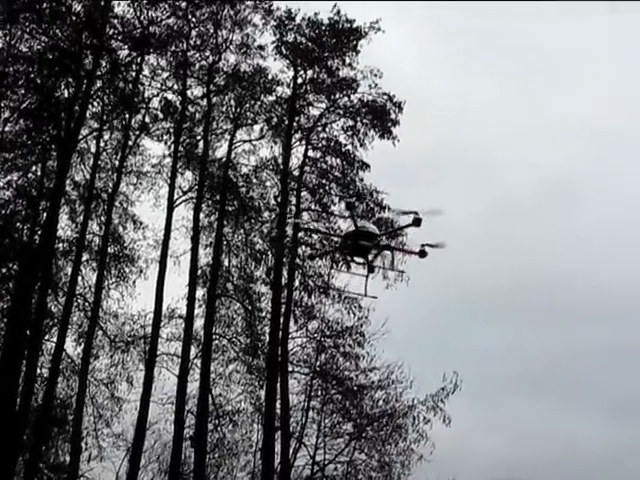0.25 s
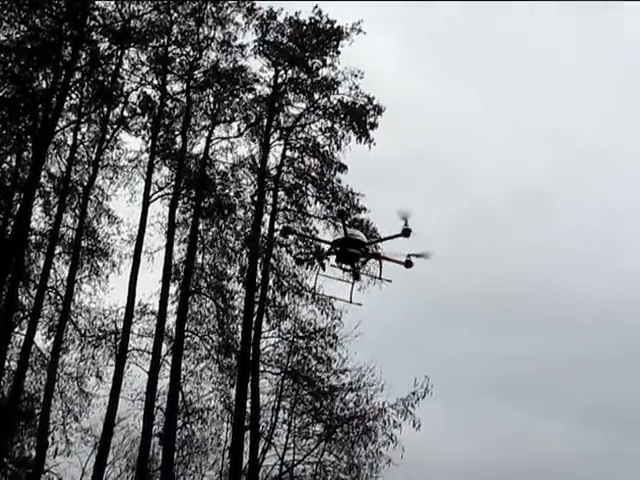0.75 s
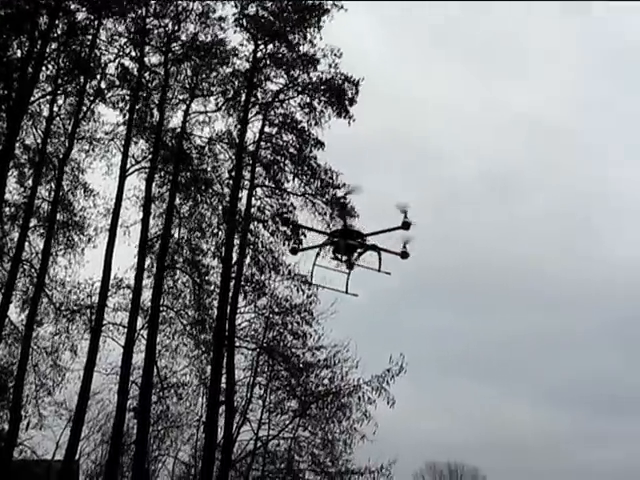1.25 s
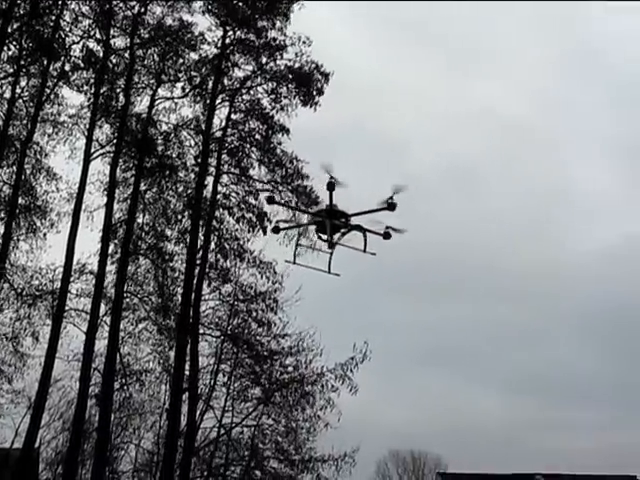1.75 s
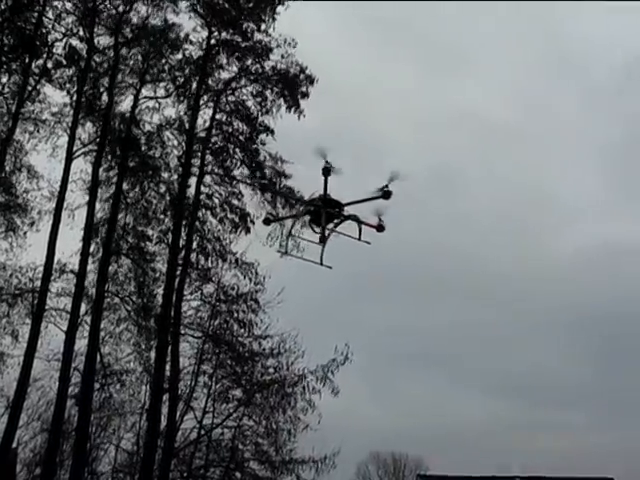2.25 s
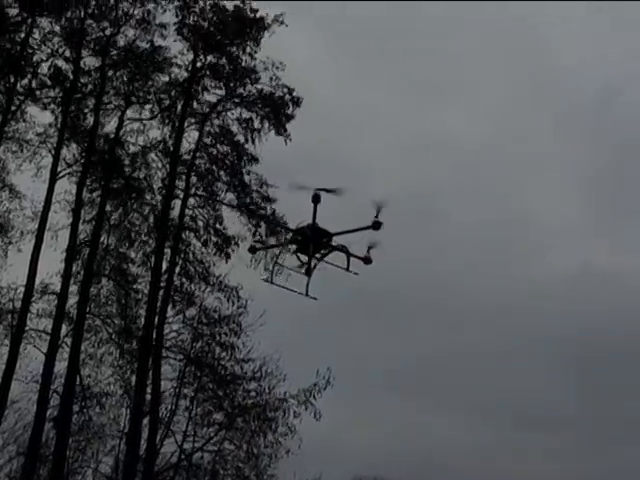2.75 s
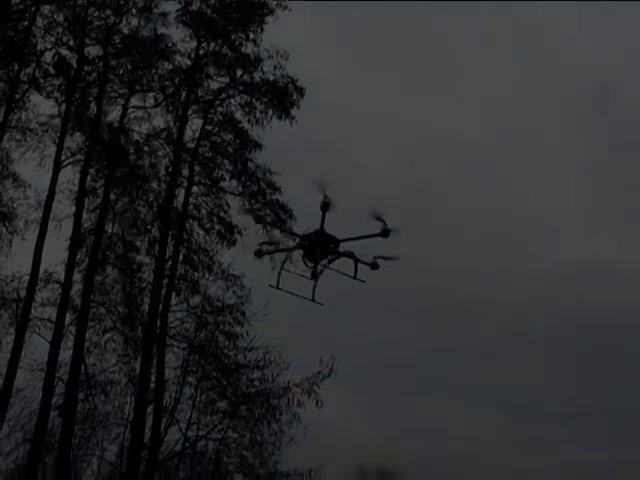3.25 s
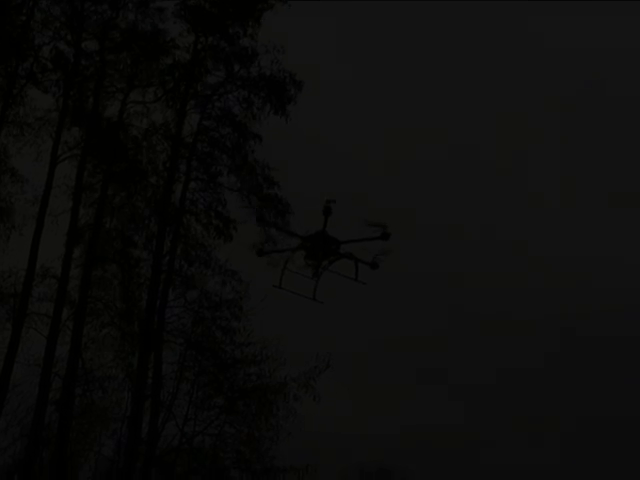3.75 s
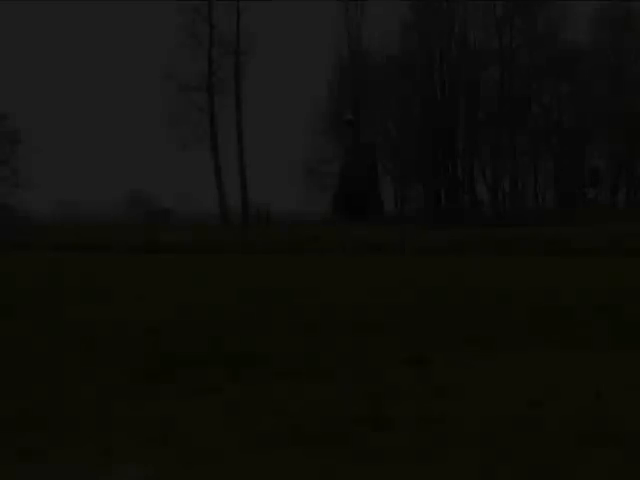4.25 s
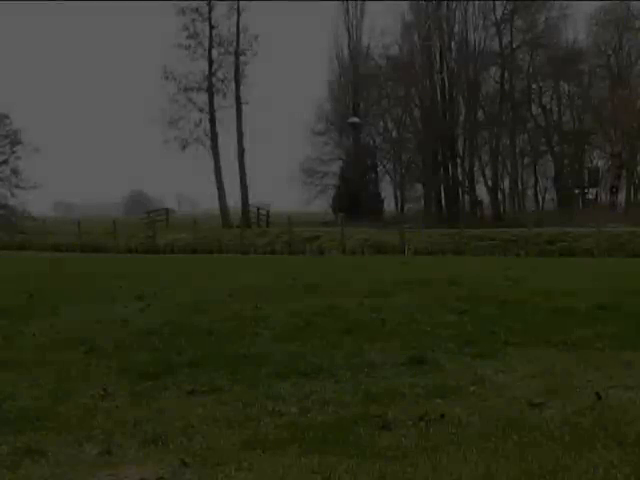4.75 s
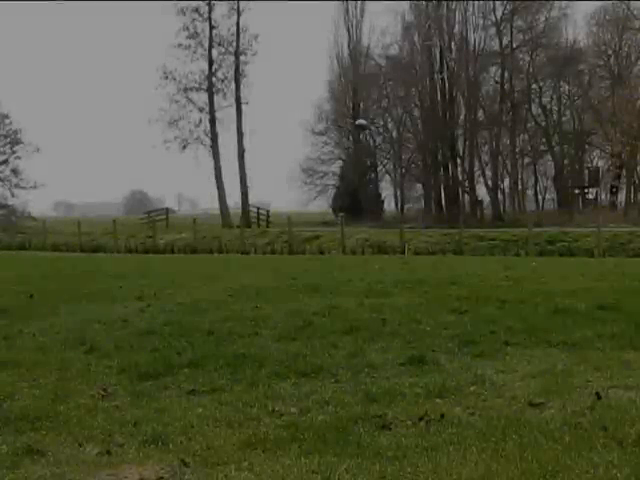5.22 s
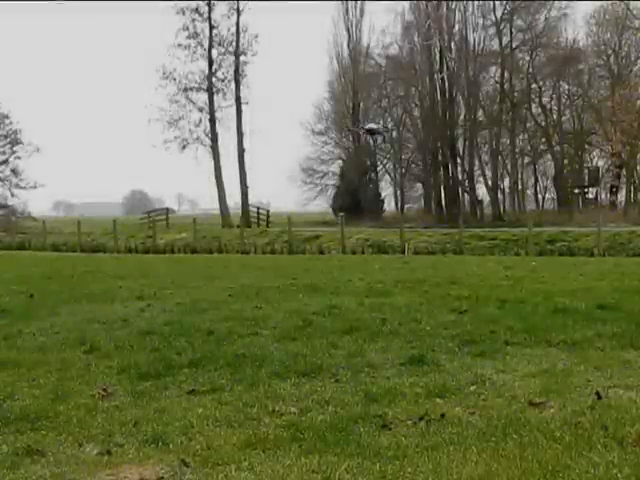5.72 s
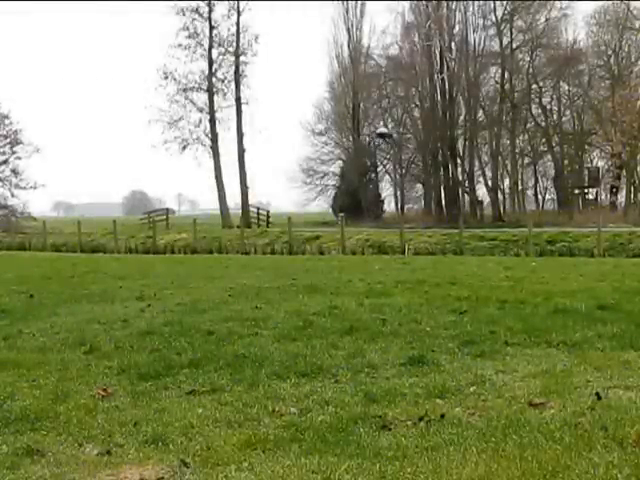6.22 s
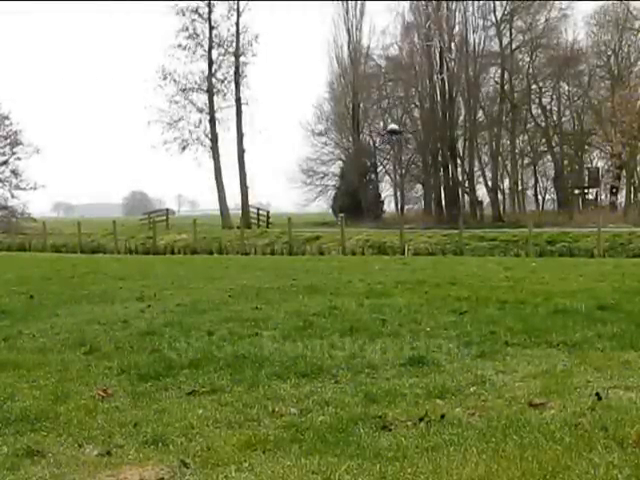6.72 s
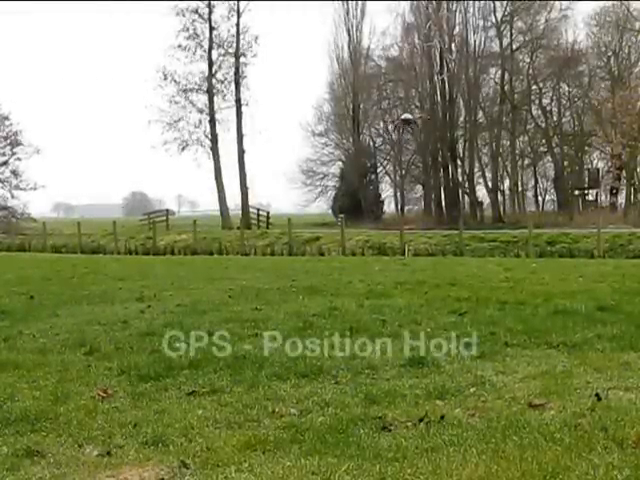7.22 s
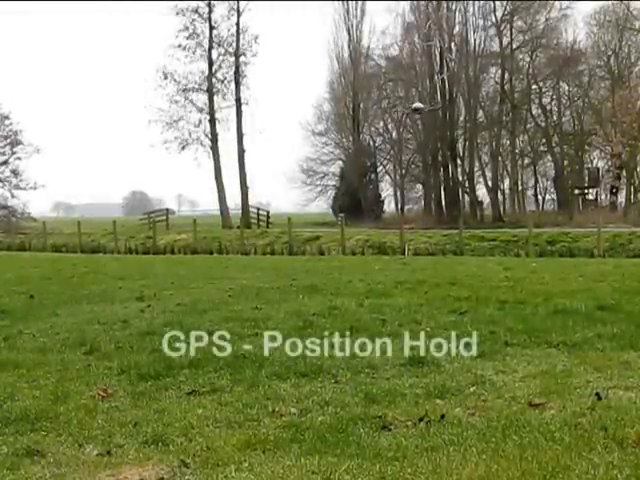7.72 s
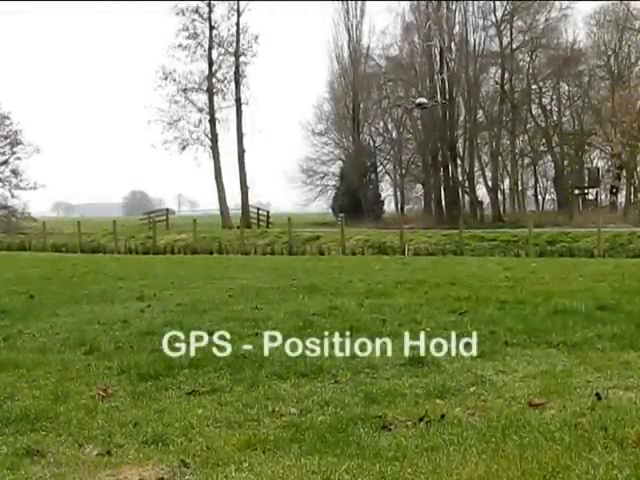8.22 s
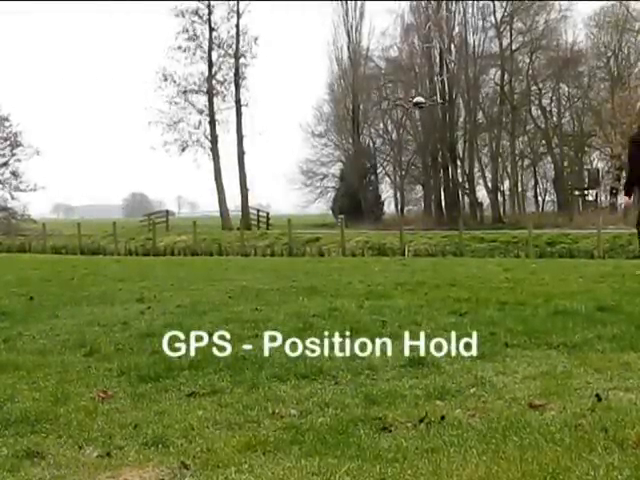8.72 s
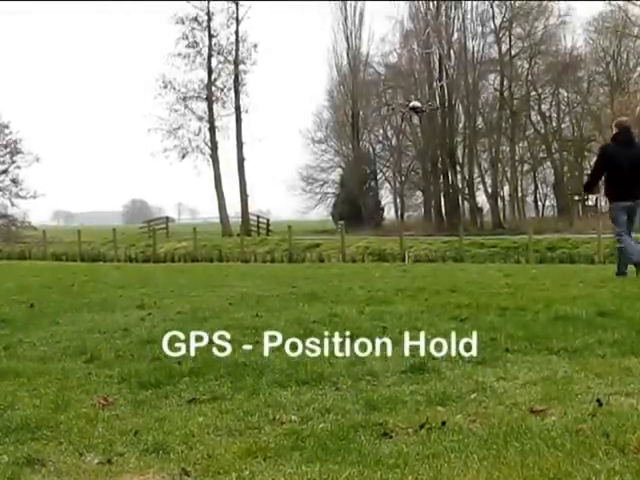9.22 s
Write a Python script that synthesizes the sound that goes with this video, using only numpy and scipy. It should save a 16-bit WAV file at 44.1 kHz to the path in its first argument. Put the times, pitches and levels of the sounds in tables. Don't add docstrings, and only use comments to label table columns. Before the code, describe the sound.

A large drone hums and hisses close by in an open meadow, its several motors beating slightly out of tune with brief piercing whistles. The sound fades down and drops out for an instant. The same craft then swells in from far away, thin and soft, its pitch nudged by small speed kicks. Low wind thumps strike each side of the bare microphone separately, with a short bird call slightly left.

```python
import sys
import numpy as np
from scipy import signal
from scipy.fft import rfft, irfft, next_fast_len
from scipy.io import wavfile
from scipy.ndimage import uniform_filter1d, map_coordinates

SR = 44100
rng = np.random.default_rng(int(sys.argv[2]) if len(sys.argv) > 2 else 0)


def makeup_ratio(level_db):
    decades = np.asarray(level_db, float) / 20
    return 10 ** decades


def wav_out(sig):
    wavfile.write(sys.argv[1], SR, np.round(np.clip(np.atleast_2d(sig).T, -1, 1) * 32767).astype(np.int16))


N = 417627
T = np.arange(N) / SR
FAR = T > 4.02
SIZE = next_fast_len(N)
HZ = np.arange(SIZE // 2 + 1) * SR / SIZE
POLES = 14


def level(x):
    return x / np.sqrt(np.mean(x ** 2))


def curves(table):
    s, *columns = np.transpose(table)
    return [np.interp(T, s, c) for c in columns]


def shot(near, far):
    return np.where(FAR, far, near)


def on_hz(table):
    hz, value = np.transpose(table)
    return np.interp(np.log(HZ + 1), np.log(hz + 1), value)


def shape(x, gain):
    return irfft(rfft(x, SIZE) * gain, SIZE)[:N]


def band(x, lo_hz, hi_hz):
    return signal.sosfilt(signal.butter(2, [lo_hz, hi_hz], "band", fs=SR, output="sos"), x)


def walk(rate_hz):
    coarse = np.arange(N // 32 + 1) * 32 / SR * rate_hz
    knots = rng.standard_normal(int(coarse[-1]) + 2)
    drift = np.interp(coarse, np.arange(len(knots)), knots)
    soft = uniform_filter1d(drift, int(SR / 32 / rate_hz) + 1)
    return np.repeat(soft / soft.std(), 32)[:N].astype(np.float32)


def swells(table, calm_db):
    coarse = T[::32]
    power = sum(makeup_ratio(db) ** 2 * np.exp(-((coarse - s) / half) ** 2) for s, half, db in table)
    return 10 * np.log10(makeup_ratio(calm_db) ** 2 + np.interp(T, coarse, power))


# time_s, pole_rate_hz
LEAD_SPEED = [(0, 963), (.3, 977), (.65, 935), (1.08, 968), (1.19, 998), (1.78, 1010), (2.3, 932),
              (2.85, 965), (3.08, 992), (4.0, 1003), (4.05, 965), (4.8, 1012), (5.2, 989), (7.3, 991),
              (8.1, 972), (8.88, 1014), (9.03, 996), (9.47, 988)]
# start_s, rise_s, pole_rate_change_hz
SPEED_KICKS = [(1.3, .1, 12), (1.58, .06, -14), (3.12, .09, 22), (3.3, .16, -17), (5.39, .07, 24),
               (5.58, .04, 14), (6.48, .15, 46), (7.17, .09, 18), (7.33, .06, -12), (7.5, .08, 16)]


def lead_speed():
    (hz,) = curves(LEAD_SPEED)
    for s, rise, change_hz in SPEED_KICKS:
        u = np.clip((T - s) / rise, 0, None)
        hz = hz + change_hz * u * np.exp(1 - u)
    return hz


# centre_s, half_length_s, level_db
BELL_SINGS = [(1.32, 0.11, -24.5), (1.52, .1, -29.5), (1.74, 0.11, -24.5), (3.14, 0.065, -25),
              (3.36, 0.072, -23), (3.8, 0.16, -29), (4.55, .08, -45), (4.78, .08, -48), (5.45, .05, -41),
              (5.62, 0.055, -44), (6.15, 0.17, -44), (6.51, 0.046, -39), (6.87, 0.062, -40.5),
              (7.25, 0.056, -44), (7.57, 0.036, -43), (8.25, .06, -45), (8.8, 0.15, -40), (9.2, 0.21, -44)]


def lead_whistle():
    return swells(BELL_SINGS, shot(-43, -49))


# near_speed_ratio, far_speed_ratio (to the lead), near_level_db, far_level_db
SIX_ROTORS = [
    (1.0, 1.0, -3.5, 1.5),
    (.93, .905, -5, -2.5),
    (1.07, .855, -9.5, -3.5),
    (1.12, .87, -7.5, -4.5),
    (.89, 0.98, -5, -4.5),
    (1.03, .83, -7.5, -5.5),
]
TONE_ORDERS = [2, 4, 6, 8, 10, 14, 16, 28, 42]
# near_level_db, far_level_db (over the low rush or winding level)
TONE_LEVELS = [(-10, -12), (-12, -12.5), (-13, -10), (-10.5, -18), (-22, -15.5), (-19.5, -24), (-23.5, -37),
               (-25.5, -20.5), (-10, -8)]
WHISTLE_HZ, WHISTLE_WIDTH_HZ, LEAD_WIDTH_HZ = 5030, 110, 150
OTHERS_LOW_DB = -10.5
FACING, FACING_DB = 0.54, -36


def rotors(pole_hz, whistle_db, low_db, winding_db):
    hum, knocks, chop = 0, 0, 0
    low, winding = makeup_ratio(low_db), makeup_ratio(winding_db)
    slow_whistle_db = uniform_filter1d(whistle_db, SR // 5)
    facing = makeup_ratio(shot(FACING, 0) * (slow_whistle_db - FACING_DB))
    sizes = [np.float32(shot(*makeup_ratio(db)) * (winding if order > 2 * POLES else low))
             for order, db in zip(TONE_ORDERS, TONE_LEVELS)]
    for k, (near, far, near_db, far_db) in enumerate(SIX_ROTORS):
        lead = k == 0
        trim = 1 + .003 * walk(18) + .002 * walk(45)
        if not lead:
            trim = trim + .012 * walk(3) + .006 * walk(9)
        motor_hz = pole_hz * shot(near, far) * trim
        turns = np.cumsum(motor_hz / POLES / SR) + rng.random()
        angle = np.float32(2 * np.pi * (turns % 1))
        gain = shot(makeup_ratio(near_db), makeup_ratio(far_db))
        tones = 0
        for order, size in zip(TONE_ORDERS, sizes):
            depth = .45 if not lead or 2 < order < 42 else .22
            tone = size * (1 + depth * walk(6)) * np.sin(order * angle)
            if not lead and order <= 4:
                tone = tone * makeup_ratio(OTHERS_LOW_DB)
            if lead and order == 4:
                tone = tone * facing
            tones = tones + tone
        for pole in (5, 6):
            off_hz = pole * motor_hz - WHISTLE_HZ
            if lead:
                answer = makeup_ratio(whistle_db + 7.5) * (pole == 5) / (1 + (off_hz / LEAD_WIDTH_HZ) ** 2)
            else:
                answer = winding * shot(*makeup_ratio((-13, -7))) / (1 + (off_hz / WHISTLE_WIDTH_HZ) ** 2)
            waver = 1 + (.28 if lead else .4) * walk(25)
            imbalance = 1 + 0.4 * np.cos(angle)
            tones = tones + answer * waver * imbalance * np.sin(pole * POLES * angle)
        if lead:
            tones = tones + winding * shot(*makeup_ratio((-7, -9))) * walk(160) * np.sin(3 * POLES * angle)
        hum = hum + gain * tones
        each_turn = np.diff(np.floor(turns), prepend=0)
        knocks = knocks + gain * each_turn * (1 + 0.11 * rng.standard_normal(N))
        blade_pass = 1 + .3 * np.cos(2 * angle) + .2 * np.cos(angle)
        chop = chop + gain * blade_pass * rng.standard_normal(N)
    return hum, level(knocks), level(chop)


# centre_hz, width_hz, near_level_db, far_level_db
BELL_MODES = [
    (5066, 444, -5, -0.5),
    (2740, 610, -3.5, -5),
    (7180, 590, -11.5, -28.5),
]


def bells(knocks, winding_db):
    drive = knocks + 1.67 * rng.standard_normal(N)
    out = 0
    for hz, width, near_db, far_db in BELL_MODES:
        ring = level(band(drive, hz - width / 2, hz + width / 2))
        out = out + makeup_ratio(winding_db + shot(near_db, far_db) + 1.02 * walk(8)) * ring
    return out


# frequency_hz, density_db_per_hz
RUSH_COLOURS = [
    [(88, -31), (150, -12.5), (213, -20), (269, -10), (422, 3), (661, -6.5), (886, -3), (2050, -4),
     (2910, -2.5), (4000, -1.5), (4600, -7), (5800, -7.5), (8000, -9.5), (15900, -19.5)],
    [(88, -0.5), (150, 3), (217, -1.5), (430, 3), (577, -4), (1400, -3), (1930, -6.5), (2910, -1.5),
     (3270, -6.5), (4300, -8.5), (5880, -10.5), (9000, -16.5), (15900, -27.5)],
]


def rush(chop, low_db, tip_db):
    flow = shot(*[shape(chop, makeup_ratio(on_hz(colour))) for colour in RUSH_COLOURS])

    def band_db(lo_hz, hi_hz):
        part = band(flow, lo_hz, hi_hz)
        return 20 * np.log10(shot(np.std(part[~FAR]), np.std(part[FAR])))

    low_gain_db = low_db - band_db(500, 2200)
    tip_gain_db = tip_db - band_db(5600, 15000)
    swell_db, out = .7 * walk(6), 0
    octave = np.log2(HZ / 125 + 1e-9)
    for k in range(8):
        part = shape(flow, np.cos(np.pi / 2 * np.clip(octave - k, -1, 1)) ** 2)
        high = np.clip((k - 3) / 3, 0, 1)
        gain_db = low_gain_db * (1 - high) + tip_gain_db * high
        out = out + part * makeup_ratio(gain_db + swell_db + 0.75 * walk(10))
    return out


# time_s, tip_rush_db
CRAFT_LOUDNESS = [(0, -28.5), (.35, -29), (.95, -27), (1.45, -28), (1.9, -27), (2.4, -26.5), (3.0, -25.5),
                  (3.3, -28), (4.0, -30), (4.04, -46.5), (5.2, -46.5), (5.6, -45), (5.95, -46.5),
                  (6.6, -45.5), (7.4, -47), (8.05, -46), (8.8, -46), (9.47, -45.5)]


def drone():
    (tip_db,) = curves(CRAFT_LOUDNESS)
    low_db = tip_db + shot(2, 4.5)
    winding_db = tip_db + shot(3.5, 6.5)
    hum, knocks, chop = rotors(lead_speed(), lead_whistle(), low_db, winding_db)
    return hum + bells(knocks, winding_db) + makeup_ratio(-0.75) * rush(chop, low_db, tip_db)


# time_s, delay_ms
GROUND_DELAY = [(0, 6.9), (1.0, 6.8), (1.4, 6.6), (2.1, 6.8), (3.99, 6.7), (4.0, .44), (5, .43), (6.2, .39),
                (7.2, .44), (8, .5), (9.47, .5)]


def ground(x):
    (delay_ms,) = curves(GROUND_DELAY)

    def grass(db, lo_hz, hi_hz):
        low_edge = (1 + (lo_hz / (HZ + 1)) ** 4) ** -.5
        high_edge = (1 + (HZ / hi_hz) ** 4) ** -.5
        return makeup_ratio(db) * shape(x, low_edge * high_edge)

    echo = shot(grass(-6.5, 60, 1900), grass(-9, 8200, 11500))
    when = np.arange(N) - delay_ms * SR / 1000
    return x + map_coordinates(echo, [when], order=3, mode="nearest")


# frequency_hz, left_minus_right_db
PORT_BALANCES = [
    [(300, -1.5), (1290, 1), (2380, -6), (3300, -5), (4400, 3.5), (8120, -2.5), (15000, 1)],
    [(300, -0.5), (700, -0.5), (1290, -3), (2380, -3.5), (4400, -0.3), (8120, -1), (15000, -2.5)],
]
# frequency_hz, left_lead_radians
PORT_PHASES = [
    [(0, 0), (1290, 0.074), (1980, -0.5), (3100, 0.61), (3880, 0.83), (5340, -0.2), (7060, 0.1),
     (7580, 0.0), (9910, -0.24), (11900, 0.1), (13100, 0.5), (14000, 0.0), (15900, 0.1)],
    [(0, 1), (1210, -0.54), (2410, 0.1), (3190, 0.98), (3880, 0.74), (4570, -0.39), (5940, -0.85),
     (6890, -0.71), (8350, 0.067), (9730, -0.2), (11500, -0.6), (14000, -0.2), (14600, -0.3), (15900, -0.1)],
]
# frequency_hz, echo_db
TREE_ECHOES = [
    [(300, -26), (700, -24), (1400, -22.5), (3000, -15), (7000, -8), (15000, -4.5)],
    [(300, -27), (700, -40), (1400, 0), (3000, -14), (7000, -9), (15000, -2.5)],
]
TREES_T60_S = 0.33


def ports(x):
    tail = np.exp(-np.log(1000) * T[:SR // 2] / TREES_T60_S)
    out = []
    for side in (1, -1):
        smear = level(rng.standard_normal(SR // 2) * tail) / np.sqrt(SR // 2)
        echo = rfft(smear, SIZE)
        shots = []
        for balance, phase, trees in zip(PORT_BALANCES, PORT_PHASES, TREE_ECHOES):
            direct = makeup_ratio(side * on_hz(balance) / 2) * np.exp(.5j * side * on_hz(phase))
            shots.append(shape(x, direct + makeup_ratio(on_hz(trees)) * echo))
        out.append(shot(*shots))
    return np.array(out)


# frequency_hz, density_db_per_hz
GUST_COLOUR = [(20, -10), (45, 0.5), (90, 3.5), (150, -1), (250, -7.5), (450, -24), (800, -41.5)]
# centre_s, half_length_s, level_db
PUFFS_LEFT = [(.15, .1, -49), (.45, 0.14, -41), (.95, .08, -40), (1.3, .2, -50), (1.88, .08, -43),
              (2.57, .06, -48), (4.2, .1, -47.5), (5.0, .1, -51), (5.6, .08, -51), (5.97, .03, -40),
              (6.1, 0.075, -38), (6.28, 0.023, -42), (6.45, .03, -42), (6.87, .015, -31.5),
              (7.03, 0.11, -37.5), (7.17, 0.049, -35), (7.28, 0.022, -35), (6.68, 0.1, -44),
              (7.55, 0.11, -41.5), (7.83, .03, -37), (8.08, 0.053, -38), (8.3, 0.014, -32),
              (8.4, 0.029, -34), (8.52, .04, -42), (8.73, 0.033, -34.5), (9.36, .05, -50)]
# centre_s, half_length_s, level_db
PUFFS_RIGHT = [(.1, 0.089, -34.5), (.45, .15, -29.5), (.8, 0.099, -29), (1.0, 0.09, -33),
               (1.22, 0.06, -32.5), (1.4, 0.1, -37), (1.82, .1, -35), (2.15, 0.13, -39.5),
               (2.56, 0.038, -30), (3.6, .3, -49), (4.8, .2, -49), (5.97, 0.051, -35), (6.1, .06, -38.5),
               (6.3, .05, -41.5), (6.65, 0.062, -42.5), (6.93, 0.017, -36.5), (7.01, 0.027, -36.5),
               (7.2, .06, -42), (7.73, 0.026, -42), (7.83, 0.076, -39.5), (8.1, .05, -40),
               (8.18, .015, -35), (8.41, 0.012, -35), (8.77, .04, -42), (8.88, .02, -40)]


def gusts():
    out = []
    for puffs, calm_db in ((PUFFS_LEFT, -50.5), (PUFFS_RIGHT, -51.5)):
        gust_db = swells(puffs, calm_db)
        air = level(shape(rng.standard_normal(N), makeup_ratio(on_hz(GUST_COLOUR))))
        air = air / np.sqrt(uniform_filter1d(air ** 2, SR // 24) + .05)
        deep = signal.lfilter(*signal.butter(2, 110, fs=SR), air)
        strength = np.clip(makeup_ratio(gust_db + 37), 0, 1.2)
        out.append((deep + strength * (air - deep)) * makeup_ratio(gust_db + 4.5 + 2.05 * walk(24)))
    return np.array(out)


# pitch_hz, near_level_db, far_level_db
CAMERA_LINES = [
    (15610, -58, -58.5),
    (14626, -71.5, -66),
    (14870, -71.5, -70),
    (7853, -76.5, -72.5),
]


def camera():
    out = 0
    for hz, near_db, far_db in CAMERA_LINES:
        phase = 2 * np.pi * np.cumsum(hz + 9.0 * np.float64(walk(30))) / SR
        out = out + makeup_ratio(shot(near_db, far_db) + 2.5 * walk(20)) * np.sin(phase)
    return out


# start_s, length_s, from_hz, to_hz, level_db
BIRD_CHIRPS = [
    (6.485, .045, 4420, 4080, -37),
    (6.56, .09, 4250, 4330, -48),
    (6.71, .09, 4200, 4030, -46),
    (6.808, .07, 4320, 4380, -45),
    (6.933, 0.06, 4400, 4300, -42),
]


def bird():
    out = np.zeros(N)
    for s, length, from_hz, to_hz, db in BIRD_CHIRPS:
        u = np.clip((T - s) / length, 0, 1)
        phase = 2 * np.pi * np.cumsum(from_hz + (to_hz - from_hz) * u) / SR
        out += makeup_ratio(db - 2 + 3 * walk(70)) * np.sin(np.pi * u) * np.sin(phase)
    return out


def scene():
    bird_sides = makeup_ratio(np.array([[3.0], [-3.0]]))
    return ports(ground(drone())) + gusts() + camera() + bird() * bird_sides


# time_s, gain
FADE_GAIN = [
    (0, 1),
    (2, 1),
    (3.997, .045),
    (3.998, 0),
    (4.056, 0),
    (6, 1),
]


def fade(x):
    return x * curves(FADE_GAIN)[0]


def top_cut(x):
    return signal.sosfilt(signal.butter(12, 16390, fs=SR, output="sos"), x)


def record(dry):
    top_edge = signal.ellip(12, .2, 90, 15720, fs=SR, output="sos")
    mix = fade(signal.sosfilt(top_edge, dry))
    return top_cut(mix)


dry = scene()
out = record(dry)
wav_out(out)
```